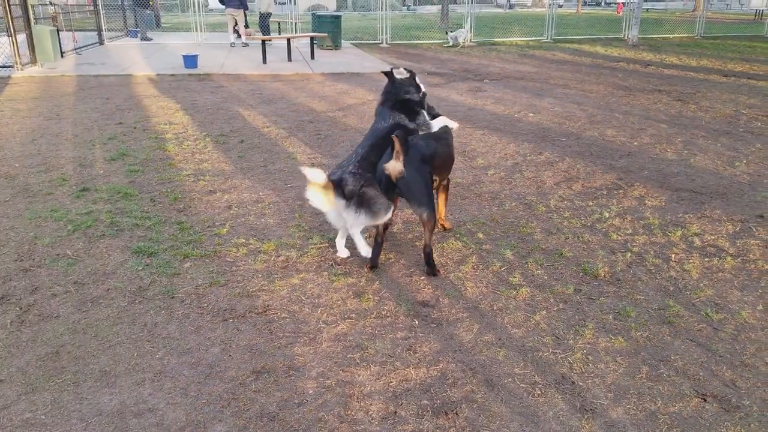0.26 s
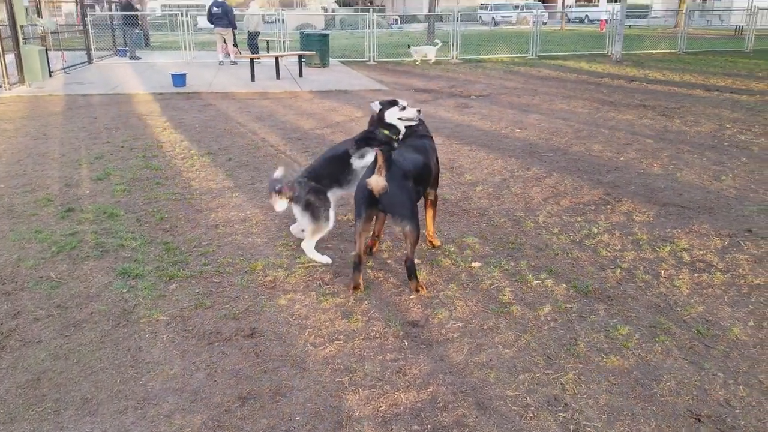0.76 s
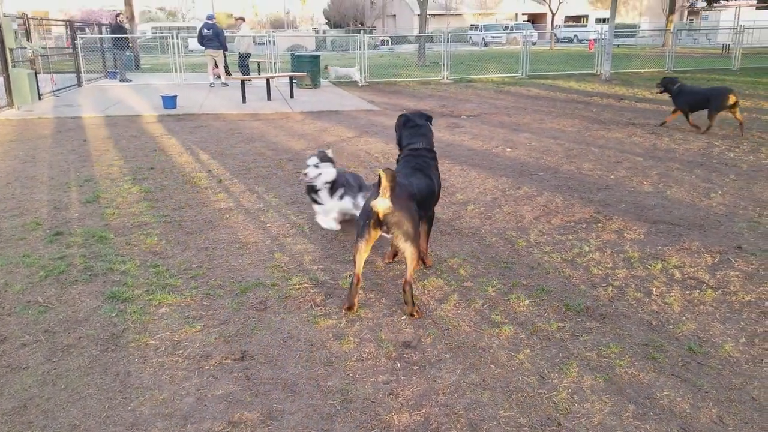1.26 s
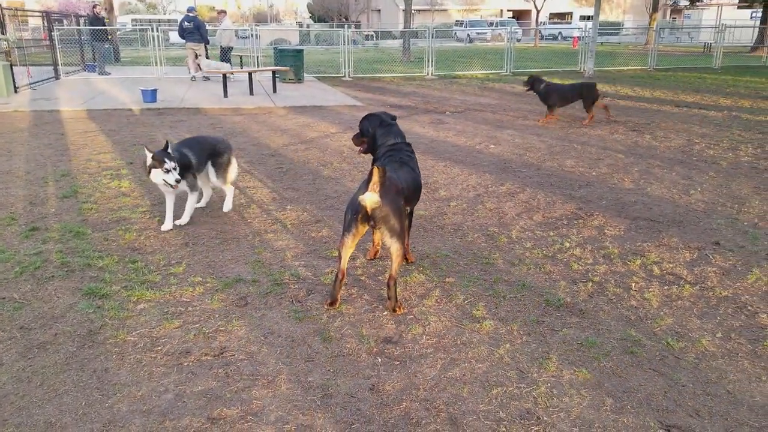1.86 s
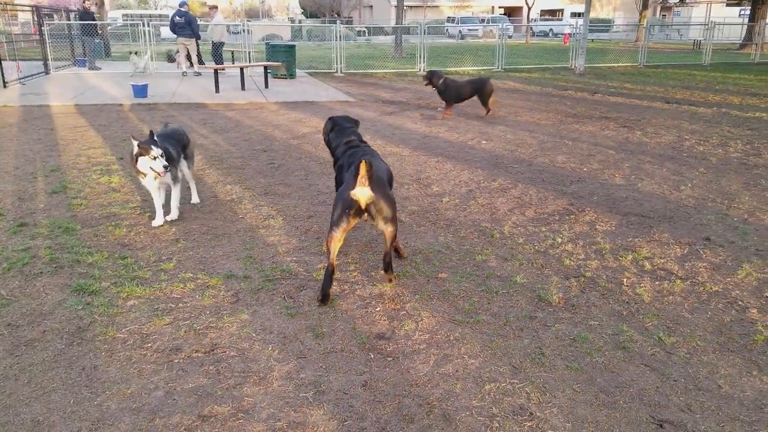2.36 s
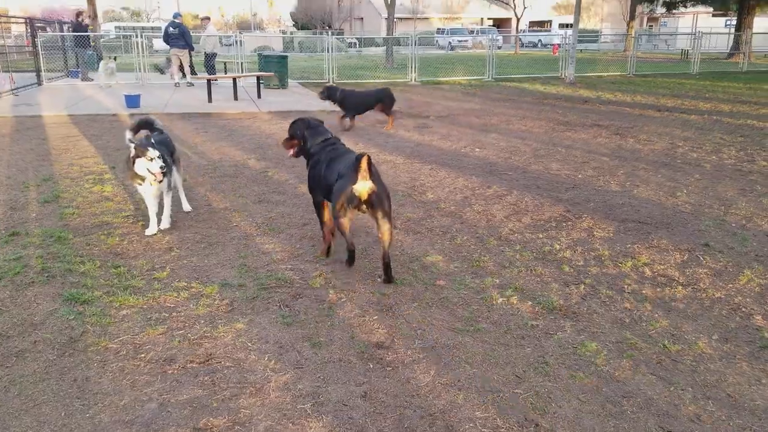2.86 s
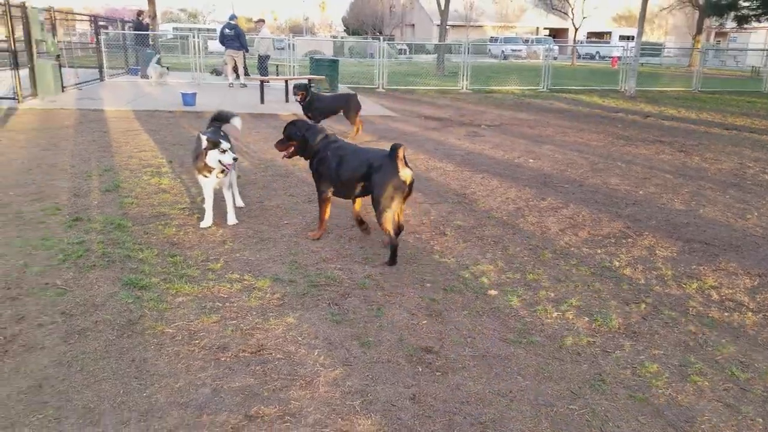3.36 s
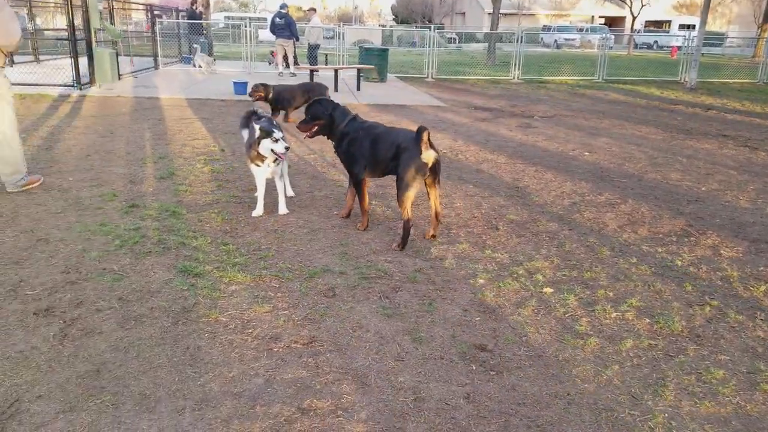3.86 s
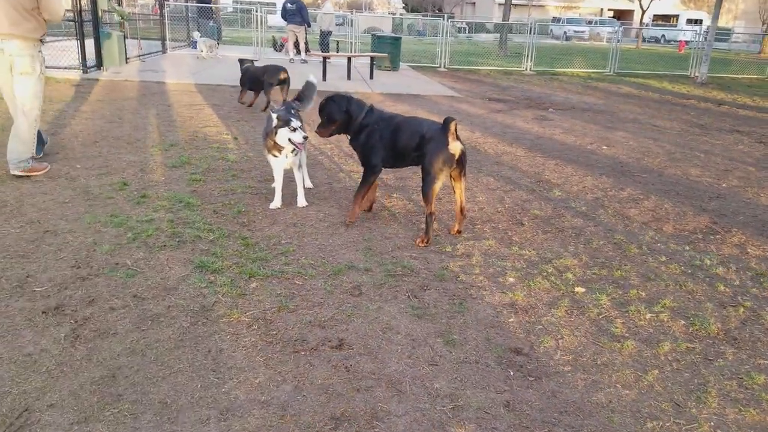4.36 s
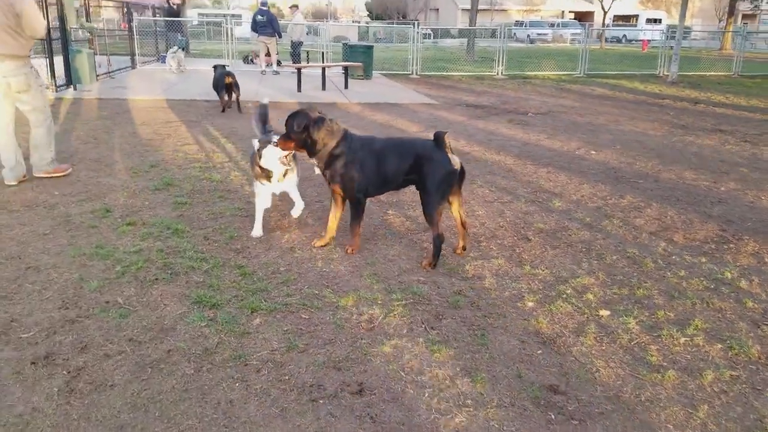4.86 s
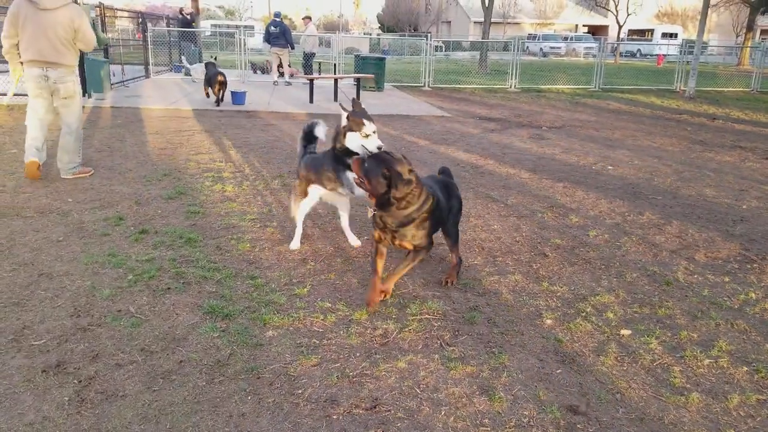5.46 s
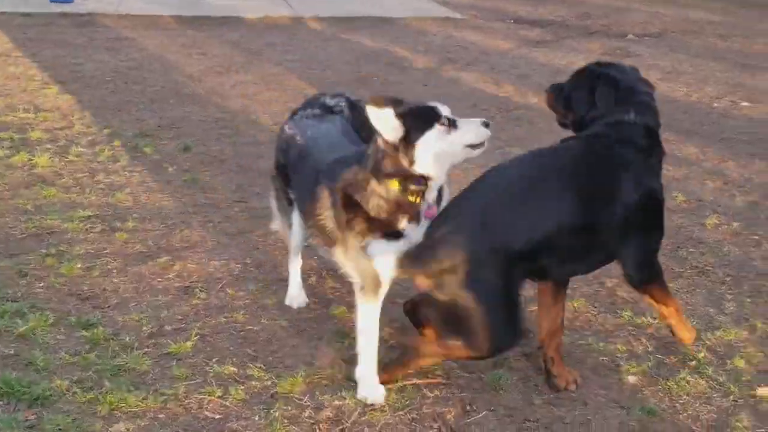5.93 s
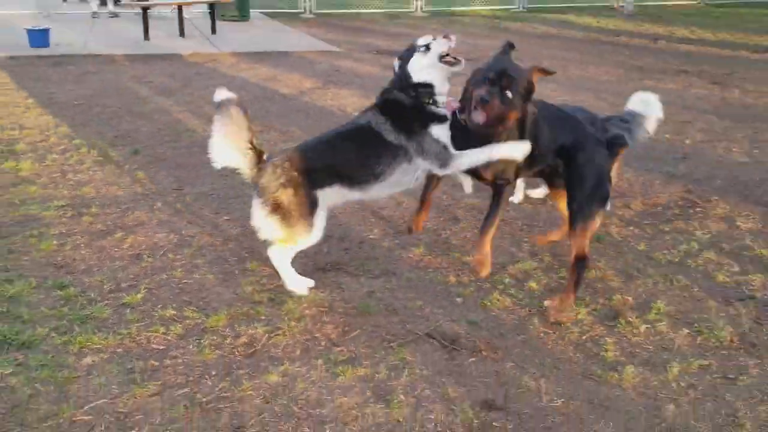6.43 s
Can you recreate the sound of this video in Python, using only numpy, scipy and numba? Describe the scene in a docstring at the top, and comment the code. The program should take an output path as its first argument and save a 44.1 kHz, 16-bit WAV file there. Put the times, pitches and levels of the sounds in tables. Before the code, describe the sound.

Handheld phone sound of two big dogs playing roughly in an open park. A tight burst of strong mid-pitched barks comes first, then a quieter spell of panting huffs, tiny metallic tag jingles and short squeaky whines. Barks resume about every half second, with faint echo off distant houses. Finally snorts, snarls, bright tag rattles and gritty paw thuds come closer over steady low traffic.

```python
"""The tail of a bark opens the scene over a rumble of traffic, and more rough barks follow: two dogs
wrestle on the dirt of an open park. Each voice is a source and a filter: tones or rasping fold pulses
drive the resonances of a throat. A growl, snarls, huffs, thin whines, a moan and a hoarse cry join in.
Collar tags ring as sums of decaying modes; paws scrape and thud as shaped noise.
Distant houses and trees return a faint echo, made by convolution with decaying noise."""
import sys
import numpy as np
from scipy import signal
from scipy.fft import rfft, irfft
from scipy.io import wavfile
from scipy.ndimage import uniform_filter1d, minimum_filter1d
from numba import njit

SR = 44100
rng = np.random.default_rng(int(sys.argv[2]) if len(sys.argv) > 2 else 0)


def wav_record(signal):
    """Record a signal, one row per channel, as 16-bit PCM in the file named by sys.argv[1]."""
    frames = np.transpose(np.atleast_2d(signal))
    bounded = np.clip(frames, -1, 1)
    # unit amplitude maps onto the largest positive 16-bit level
    quanta = np.round(bounded * 32767).astype(np.int16)
    wavfile.write(sys.argv[1], SR, quanta)


N = 295236


def undb(db):
    """Level: decibels to amplitude gain."""
    return 10 ** (np.asarray(db) / 20)


def unit(x):
    """Normalization: scale to rms 1."""
    return x / np.sqrt(np.mean(x ** 2) + 1e-18)


def add(out, start_s, x):
    """Superposition: mix a sound into both channels from a start time on."""
    i = max(int(start_s * SR), 0)
    out[:, i:i + x.shape[-1]] += x[..., :N - i]


def clock(length_s):
    """Time base: seconds since the start of a sound, and a 3 ms fade at both edges."""
    t = np.arange(int(length_s * SR)) / SR
    return t, np.clip(np.minimum(t, length_s - t) / .003, 0, 1)


def play(rows):
    """Interpolation: start time, a 3 ms edge fade and every column of a curve, sample by sample."""
    s, *columns = np.transpose(rows)
    t = np.arange(int(s[0] * SR), int(s.max() * SR)) / SR
    fade = np.clip(np.minimum(t - t[0], t[-1] - t) / .003, 0, 1)
    return (s[0], fade, *(np.interp(t, s, c) for c in columns))


def swell(t, attack_s, release_s, edge_db=24):
    """Envelope: attack, hold and release, in dB below the held level; each edge lies edge_db down."""
    rise = np.clip(1 - t / attack_s, 0, 1) ** 2
    fall = np.clip(1 - (t[-1] - t) / release_s, 0, 1) ** 2
    return -edge_db * (rise + fall)


def arch(t, share, first, crest, last):
    """Control contour: a value moves to its crest at a share of the length, and on to its last value."""
    return np.interp(t / t[-1], [0, np.clip(share, .02, .98), 1], [first, crest, last])


def walk(n, rate_hz):
    """Random modulation: a smooth wander with a spread near 1."""
    k = max(int(SR / rate_hz), 1)
    steps = np.repeat(rng.standard_normal(n // k + 2), k)
    return 1.2 * uniform_filter1d(steps, k)[k // 2:k // 2 + n]


@njit
def svf(x, hz, width):
    """Resonance: a state-variable band-pass whose centre may move."""
    y, b, l = np.empty(len(x)), 0., 0.
    for i in range(len(x)):
        g, k = np.tan(np.pi * hz[i] / SR), width / hz[i]
        v = (b + g * (x[i] - l)) / (1 + g * (g + k))
        b, l, y[i] = 2 * v - b, l + 2 * g * v, k * v
    return y


def resonate(x, hz, width_hz):
    """Cascaded resonance: the band-pass applied twice for steep skirts, then scaled to rms 1."""
    hz = hz * np.ones(len(x))
    return unit(svf(svf(x, hz, float(width_hz)), hz, float(width_hz)))


def band(x, lo_hz, hi_hz, order=2):
    """Band limiting: a Butterworth band-pass."""
    sos = signal.butter(order, [lo_hz, min(hi_hz, .47 * SR)], "band", fs=SR, output="sos")
    return signal.sosfilt(sos, x)


def steady(x, seconds=0.029):
    """Level equalization: even out slow swings of power and keep the fast rasp."""
    power = np.abs(uniform_filter1d(x ** 2, max(int(seconds * SR), 8)))
    return x / np.sqrt(power + 1e-9)


def pan(db):
    """Interchannel level difference: left and right gains, with db as left minus right."""
    return undb(np.array([[db], [-db]]) / 2)


def spread(draw, alike):
    """Interchannel correlation: two channels from a shared and an opposed sound."""
    alike = np.clip(alike, 0, 1)
    return np.sqrt((1 + alike) / 2) * draw[0] + np.sqrt((1 - alike) / 2) * draw[1] * np.array([[1], [-1]])


def park():
    """Shaped noise and a wavering tone: traffic rumble, an engine drone and a distant wash of the town."""
    # spectral shape of the noise, before its low and high parts are levelled: hz, level_db
    colour_curve = [(15, -42), (25, -16), (82, -1), (140, -1), (193, -4), (368, -15), (614, -20.5),
                    (919, -19), (2560, -25), (3340, -37), (5280, -44), (6380, -44.5), (9550, -54),
                    (12500, -47), (15500, -46.5)]
    # background rumble as heard at the phone, with its dips, before a 2 dB lift: time_s, level_db
    rumble_curve = [(0.0, -47.5), (0.69, -54.5), (1.49, -52), (1.75, -47), (4.49, -48.5), (5.09, -54.5),
                    (6.69, -48.5)]
    # wash as heard at the phone, with its dips and rises, before a 3 dB cut: time_s, level_db
    wash_curve = [(0, -52), (.6, -49), (1.3, -56), (2, -46.5), (2.5, -50.5), (3.1, -46), (4.9, -49),
                  (5.2, -53.5), (5.5, -49), (6.69, -43)]
    drone_hz, drone_db = 145, -54.5  # mean pitch; mean level where the rumble curve is highest
    time = np.arange(N) / SR
    rumble_db, wash_db = (np.interp(time, *np.transpose(curve)) for curve in (rumble_curve, wash_curve))
    f = np.arange(N // 2 + 1) * SR / N + 1
    hz, db = np.transpose(colour_curve)
    colour = undb(np.interp(np.log(f), np.log(hz), db))
    # the channels agree most in the low frequencies
    alike = 0.92 / (1 + (f / 1500) ** 2) / (1 + (20 / f) ** 2)
    noise = colour * spread(rfft(rng.standard_normal((2, N))), alike)
    low_share = 1 / (1 + (f / 400) ** 4)
    rumble = unit(irfft(noise * low_share, N)) * undb(rumble_db + 2.0 + walk(N, 19))
    wash_flutter_db = 2.8 * walk(N, 2.49) + 0.59 * walk(N, 16)
    wash = unit(irfft(noise * (1 - low_share), N)) * undb(wash_db - 3.0 + wash_flutter_db)
    drone = unit(np.sin(2 * np.pi * np.cumsum(drone_hz * (1 + 0.026 * walk(N, 8.4))) / SR))
    return rumble + wash + drone * undb(drone_db + rumble_db - rumble_db.max() + 4 * walk(N, 5.0))


def folds(hz, rough, jitter=.14, shimmer_db=4, puff=0.93):
    """Glottal excitation: uneven pulses, each followed by a puff of turbulent air."""
    n = len(hz)
    phase = np.cumsum(hz * np.exp(jitter * rough * walk(n, 220))) / SR % 1
    pulses = (np.diff(phase, prepend=0) < 0) * undb(shimmer_db * rough * walk(n, 162.69))
    air = np.exp(-phase / puff) * rng.standard_normal(n)
    return unit(pulses) + rough * unit(air)


def bark(row, throat):
    """Source-filter voice: a wavering tone and rasp drive a throat; the jaw opens and shuts the mouth sound."""
    # widths of the four throat resonances a to d, in Hz
    mouth_widths_hz = [242, 234, 248, 382]
    rasp_share, rough = .25, .65  # the folds rasp at this share of the pitch; roughness 0-1
    tone_db, half_tone_db, hiss_db = 0.5, -37, -36  # relative levels inside the bark
    mouth_rise, brighten_db = 0.066, 4  # over a bark: lift of the resonances (share), gain of resonance d
    _, length, attack, release, level_db, first_hz, crest_hz, last_hz, *rest = row
    crest, widest, shut_db, a_db, upper_db, side, _ = rest
    *mouth_hz, top_hz, b_db, d_db, follow = throat
    t, fade = clock(length)
    n = len(t)
    hz = arch(t, crest, first_hz, crest_hz, last_hz)
    effort_db = swell(t, attack, release)
    # the jaw is still 0.12 open as the bark ends
    jaw_db = -shut_db * (1 - np.sin(np.pi / 2 * arch(t, widest, 0, 0.97, 0.12)))
    relative_pitch = hz / np.average(hz, weights=undb(effort_db))

    # soft parts of a bark stay cleaner; pushed hard, the folds break into rasp
    push = undb(0.15 * effort_db)
    phase = 2 * np.pi * np.cumsum(hz * (1 + 0.052 * rough * push * walk(n, 259.63))) / SR
    flutter = undb(5 * rough * push * walk(n, 220))
    tone = unit(flutter * np.sin(phase))
    overtones = unit(flutter * sum(np.sin(k * phase) for k in range(2, 5)))
    rasp = folds(rasp_share * hz, rough)
    source = push * unit(band(rasp, 550, 3600)) + undb(tone_db - 8.5) * overtones
    low = steady(push * resonate(rasp, hz * 0.97, 250) + undb(tone_db) * tone, seconds=0.017)

    # the lips draw back; the resonances bend with or against the pitch, as the exponent sets
    lips = t / length - .5
    glide = relative_pitch ** follow * (1 + mouth_rise * lips)
    mouth_a, mouth_b, mouth_c, mouth_d = (resonate(source, f * glide, w)
                                          for f, w in zip(mouth_hz, mouth_widths_hz))
    mouth_d = mouth_d + undb(-13) * unit(band(source, 2200, 2980))
    upper = undb(b_db) * mouth_b + mouth_c + undb(d_db + brighten_db * lips) * mouth_d
    # the sound fades above the top edge
    upper = steady(band(upper, 1200.0, top_hz, order=8), seconds=0.013)

    # air hisses past the teeth; each microphone port favours its own part of the treble
    air = flutter * rng.standard_normal((2, n))
    ports = np.array([resonate(air[0], 5700, 3900), 0.86 * resonate(air[1], 7600, 3800)])
    broad_air = undb(-3) * unit(band(air, 3000, 20000))
    # the -0.3 makes the hiss follow the jaw less than the resonances do
    hiss = undb(hiss_db - 0.3 * jaw_db) * (ports + broad_air)
    treble = undb(upper_db) * pan(2 + 2.8 * side) * (upper + hiss)

    half_tone = unit(flutter * np.sin(phase / 2))
    chest = undb(-39.5) * unit(band(rasp, 150, 290)) + undb(half_tone_db) * half_tone
    body = undb(effort_db) * (band(low, 446.0, 1500, order=5) + chest)
    # the mouth opens after the voice starts, then flares and fades unevenly
    flare_db = swell(t, 0.11 * length, 0.0069) + 1.5 * push * walk(n, 80.4)
    mouth = undb(jaw_db + flare_db) * (undb(a_db) * steady(mouth_a, seconds=0.0061) + treble)
    left, right = fade * undb(level_db) * (body + mouth)
    # for a dog on the left, sound reaches the right microphone port 0.1 ms later
    return np.array([left, np.interp(t - side * .0001, t, right)])


def barks():
    """Articulation: each bark has its own pitch arch and throat; yields start, sound and echo level."""
    # start_s, length_s, attack_s, release_s, level_db, first_pitch_hz, crest_pitch_hz, last_pitch_hz,
    # crest_share and widest_jaw_share (of the length), shut_jaw_damping_db, resonance_a_db,
    # other_resonances_db, side (-1 right to 1 left), echo_db
    bark_rows = [ (0, 0.044, 0.0033, 0.053, -9.5, 694, 634, 545, 0.16, 0.04, 27, -1, -12.5, -0.55, 1.5),
                 (0.037, 0.13, 0.025, 0.046, -17.5, 659, 714.6, 580, 0.56, 0.67, 11.5, -3.5, -12, -1.05, 4),
                 (0.165, 0.15, 0.08, .08, -9.5, 665, 698.7, 548, 0.28, 0.51, 26, -7, -16, -0.97, 0),
                 (.47, 0.12, 0.016, 0.034, -20.5, 681, 790.2, 524, 0.28, 0.45, 21.5, -4, -3.5, -.8, 4),
                 (2.022, .11, 0.024, 0.1, -24, 527.6, 558.4, 457, 0.34, 0.46, 18, -15.5, -21, 1, 3),
                 (3.117, 0.15, 0.037, 0.016, -14.5, 598.7, 785, 493, 0.54, 0.66, 25, 1.5, -5.5, 1, 4),
                 (3.668, 0.15, 0.017, 0.081, -14.5, 628, 775, 572, 0.34, 0.47, 28, -4, -8.5, 0.79, 4),
                 (4.209, .123, 0.032, 0.036, -13.5, 620, 741, 557.5, .4, 0.8, 22.5, -7.5, -11, .7, 4.5),
                 (4.791, .146, 0.038, 0.024, -12.5, 934.5, 971, 761, 0.19, .33, 16.5, -5, 0, .75, -8),
                 (5.585, 0.23, 0.22, 0.068, -13, 420, 771, 521.5, 0.67, 0.7, 38, -5, -7, 0.54, -.5),
                 (5.89, .15, 0.083, 0.024, -19.5, 400, 732, 760, .88, 0.58, 34, -3.5, 0.5, -0.45, -2)]
    # four throat resonances in each bark, not in order of pitch: a_hz, b_hz, c_hz, d_hz, top_edge_hz,
    # b_db, d_db, pitch_exponent (resonances move with the pitch if positive, against it if negative)
    throat_rows = [ (1156, 2600, 2026, 2350, 2370, -3, -7, 0.49),
                   (1090, 980, 1600, 2500, 2300, 5.5, -20.5, 0.085),
                   (1205, 3300, 2100, 2340, 2590, -4, -2.5, 0.54),
                   (1173, 1436, 1640, 2120, 2500, -1.5, -9.5, -0.064),
                   (1140, 850, 1720, 2800, 1900, -19, -3, .1),
                   (1047, 1410, 1630, 2210, 2640, -7, -13, -0.099),
                   (1090, 1593, 1680, 2028, 2300, -5, -4.5, -0.45),
                   (1117, 1360, 1566, 2100, 2600, -5.5, -10, -0.16),
                   (1158, 1870, 2117, 2670, 3020, 4, -11.5, 0.82),
                   (1064, 1630, 1874, 1400, 2634, 1, -34, 0.28),
                   (1423, 1820, 2030, 2208, 2860, -2, -17, -0.07)]
    for row, throat in zip(bark_rows, throat_rows):
        yield row[0], bark(row, throat), row[-1]


def echoes(x, near_db=-19, near_t60=0.23, far_db=-29, far_t60=0.85):
    """Reverberation: fences and benches scatter early; houses and trees keep a faint, coloured tail."""
    # bands that linger in the echo: centre_hz, width_hz, level_db
    echo_bands = [(646, 94, -11.5), (1070, 100, -0.5), (1684, 260, 10.5)]
    t = np.arange(int(1.5 * SR)) / SR
    response = 0
    for db, t60, onset_s in ((near_db, near_t60, .012), (far_db, far_t60, .06)):
        scatter = spread(rng.standard_normal((2, len(t))), 0.11)
        rings = np.array([sum(undb(d) * resonate(side, hz, width) for hz, width, d in echo_bands)
                          for side in scatter])
        # the rings lie 20 dB below the diffuse part
        tail = unit(band(scatter, 340, 8200, order=1)) + undb(-20) * unit(rings)
        tail = tail * np.exp(-np.log(1000) * t / t60) * (1 - np.exp(-(t / onset_s) ** 2))
        response = response + undb(db) * unit(tail) / np.sqrt(len(t))
    return signal.fftconvolve(x.mean(axis=0)[None], response, axes=1)[:, :N]


def clink(low_db, mid_db):
    """Modal synthesis: one tag hits another, a tick and then decaying modes of randomly varied strength."""
    # hz, level_db (before group trims and scatter), t60_s
    modes = [(5030, -13, 0.038), (5610, -15, .1), (6437, 2.5, 0.071), (6830, -6, 0.025), (8510, -7, 0.22),
             (10080, 7.5, 0.087), (10610, 3.5, 0.13), (12800, -19, .08), (13050, -5, 0.1), (13400, -7, .07),
             (14200, -6.5, 0.084), (14600, -4.5, 0.077), (15400, -20, .06)]
    # left minus right, in dB, for the low, middle and high modes
    mode_pan_db = (8.5, -7.5, 0)
    t = np.arange(SR // 4) / SR
    hz, db, t60 = np.transpose(modes)[:, :, None]
    group = np.digitize(hz, [8000, 12000])
    db = db + np.array([low_db, mid_db, -3])[group]
    db = db + np.array(mode_pan_db)[group] * np.array([[[.5]], [[-.5]]])
    strength, phase, detune = rng.standard_normal((3, 2, len(hz), 1))
    wobble = 1 + 0.0019 * detune[0]
    ring = undb(db + 7 * strength - 60 * t / t60) * np.sin(2 * np.pi * hz * wobble * t + np.pi * phase)
    # the edges scrape for a moment as they meet
    scrape = band(rng.standard_normal((2, len(t))), 9000, 21000, order=1) * np.exp(-t / 0.017)
    return (0.34 * unit(ring.sum(axis=1)) + undb(0.5) * scrape) * (1 - np.exp(-t / 0.00031))


def tags():
    """Repeated impact: collar tags meet once a swing, and faint grazes cluster around each strike."""
    # clearest strikes: start_s, level_db (before a 12 dB cut), low_modes_db, middle_modes_db (mode trims)
    clear_strikes = [(1.0755, -40, -18, -46), (1.1543, -43.5, -19, -6), (1.2239, -44, -14, -13),
                     (1.4268, -39, -4, -7), (1.5341, -44.5, 3, -19), (1.7674, -44.5, -8, -36),
                     (2.203, -45, 6, -31.5), (4.3731, -48, -15, -27), (4.9367, -47.5, -4, -17),
                     (5.233, -38.5, -10.5, -9.5), (5.2928, -36, -20, -10), (5.5378, -32, -18, -25),
                     (5.6017, -32.5, -17.5, -27), (5.7617, -33, -3, -16), (6.0425, -35.5, 2, -16),
                     (6.3447, -27, -11, -4), (6.4258, -24, -9, -15), (6.4424, -23.5, 2, -7),
                     (6.4943, -25.5, -9.5, -29), (6.6086, -16.5, -0.5, -15), (6.6162, -29, -26, -21.5)]
    # spells of lighter jingling: start_s, length_s, then level and mode trims as above
    jingle_spells = [(0.062, .3, -59, -5.5, -8), (1.614, .55, -49, -4.5, -25), (2.314, .2, -50.5, 7, -23),
                     (5.499, .05, -39, -3, -14), (5.976, .14, -34, -17, -18), (6.32, .3, -32.5, -9, -20)]
    swing_s, scatter_s, scatter_db = 0.12, 0.0048, 5.5
    out, strikes = np.zeros((2, N)), list(clear_strikes)
    for start, length, db, low_db, mid_db in jingle_spells:
        for swing, (late, louder) in zip(np.arange(0, length, swing_s), rng.standard_normal((20, 2))):
            strikes.append((start + swing + scatter_s * late, db + scatter_db * louder, low_db, mid_db))
    for start, db, low_db, mid_db in strikes:
        add(out, start, undb(db - 12) * clink(low_db, mid_db))
        for delay, softer_db in zip(rng.uniform(-0.017, 0.058, size=3), rng.uniform(15.9, 30.7, size=3)):
            add(out, start + delay, undb(db - softer_db) * clink(low_db, mid_db))
    return out


def harmonics(hz, harmonics_db, jitter):
    """Harmonic series: regular vibration with a few harmonics on one gliding, jittered pitch."""
    phase = 2 * np.pi * np.cumsum(hz * (1 + jitter * walk(len(hz), 180))) / SR
    return unit(sum(undb(h) * np.cos((k + 1) * phase) for k, h in enumerate(harmonics_db)))


def clean_call(rows, harmonics_db, jitter):
    """Periodic phonation: a voiced call that follows its pitch and level curve."""
    start, fade, hz, db = play(rows)
    return start, fade * undb(db) * harmonics(hz, harmonics_db, jitter)


def growl():
    """Low phonation: many harmonics of a low pitch."""
    # time_s, pitch_hz, level_db
    growl_curve = [(.3, 157.7, -38), (.325, 149, -35.5), (.36, 144.7, -38), (.395, 166.3, -33),
                   (.42, 164.1, -37), (.45, 141, -58)]
    harmonics_db = [-18.5, -23.5, -6.5, -3.5, -7.5, -25.0, -12.5, -21, -36.0, -16, -17.5, -27, -37.5, -15.0,
                    -26.0]
    return clean_call(growl_curve, harmonics_db, jitter=0.012)


def snarl(length, chest_db, mouth_db, lips_db):
    """Turbulent source and filter: slow, breathy fold pulses sound through chest and bared teeth."""
    # mouth resonances: centre_hz, width_hz, relative_db
    mouth_resonances = [(1310, 240, 3.5), (1928, 200, 1), (2510, 290, -0.5)]
    t, fade = clock(length)
    n = len(t)
    source = folds(np.full(n, 110.), rough=0.817) + 0.54 * rng.standard_normal(n)
    drift = 1 + .025 * walk(n, 19.3)
    release_s = .45 * length
    # in all but the shortest snarls, air rushes first and the chest joins in
    chest = steady(resonate(source, 660 * drift, 260)) * undb(swell(t, 0.42 * length, release_s))
    second, *upper = (undb(db) * resonate(source, hz * drift, width) for hz, width, db in mouth_resonances)
    mouth = steady(band(second + undb(lips_db) * sum(upper), 800, 2600, order=6))
    mouth = mouth * undb(swell(t, 0.021, release_s))
    return fade * (undb(chest_db - 9.5) * chest + undb(mouth_db - 6.0) * mouth)


def snarls():
    """Superposition: breathy snarls and snorts, each with its own balance of chest and mouth."""
    # start_s, length_s, chest_db (before a 9.5 dB cut), mouth_db (before a 6 dB cut),
    # lips_db (change of the upper resonances by the lips)
    snarl_rows = [(1.065, .1, -32, -33, -2), (1.383, 0.05, -37.5, -49, -2), (4.765, 0.038, -30, -31.5, -6),
                  (5.261, 0.18, -32, -34, -7), (5.452, 0.043, -35, -39, -1.5), (5.536, 0.065, -35, -44, -4),
                  (6.036, 0.062, -33, -39.5, 4), (6.226, 0.039, -33, -34.5, 2),
                  (6.332, 0.11, -66, -38, 2.5), (6.483, 0.023, -27, -27.5, 14),
                  (6.553, 0.08, -42, -29.5, 6), (6.626, 0.09, -28.5, -41, -13)]
    out = np.zeros((2, N))
    for start, *row in snarl_rows:
        add(out, start, snarl(*row))
    return out


def huffs():
    """Filtered turbulence: short puffs of air through a dog's muzzle."""
    # start_s, length_s, level_db, nasal_hiss_db
    huff_rows = [(1.072, 0.1, -47, -54.5), (1.49, 0.11, -56, -68), (1.797, 0.13, -51.5, -80),
                 (2.188, 0.08, -51.5, -75.5), (2.288, 0.1, -55, -83), (5.064, 0.076, -52, -67)]
    out = np.zeros((2, N))
    for start, length, db, nose_db in huff_rows:
        air = rng.standard_normal(SR)[:int(length * SR)]
        muzzle = .5 * resonate(air, 1350, 500) + resonate(air, 2200, 460)
        nose = unit(band(air, 2700, 3970, order=2))
        add(out, start, np.hanning(len(air)) ** .5 * (undb(db) * muzzle + undb(nose_db) * nose))
    return out


def whine(length, first_hz, last_hz, db, octave_db, loudest):
    """Frequency glide: a thin nasal whine, sometimes with a strong octave, swells, fades and slides."""
    t, fade = clock(length)
    hz = first_hz + (last_hz - first_hz) * (t / length) ** 2
    level = undb(db + arch(t, loudest, -19, 0, -18))
    return fade * level * pan(7) * harmonics(hz, [0, octave_db], jitter=0.0028)


def whines():
    """Superposition: thin whines, louder on the left."""
    # start_s, length_s, first_pitch_hz, last_pitch_hz, level_db, octave_db (relative),
    # loudest_share (of the length)
    whine_rows = [(2.082, .058, 2630, 2600, -33.5, -21, 0.87), (2.133, 0.037, 2395, 2635, -24.5, -32, 0.48),
                  (3.957, 0.094, 2690, 2670, -54, 1, 0.79), (4.064, 0.065, 2800, 2730, -67, -27, 0.55),
                  (4.259, 0.078, 2800, 2500, -47.5, 0, 0.85)]
    out = np.zeros((2, N))
    for start, *row in whine_rows:
        add(out, start, whine(*row))
    return out


def grit(n, spread_db=3):
    """Random impacts: a dense crackle of dirt grains with a few large ones."""
    sizes = undb(spread_db * np.minimum(rng.exponential(size=n), 4))
    grains = (rng.random((2, n)) < 7000 / SR) * sizes  # 7000 grains a second in each draw
    grains = spread(grains * rng.standard_normal((2, n)), 0.15)
    return unit(band(grains, 2100, 5900, order=1))


def paws():
    """Friction and impact: paws scrape the dirt and land with a thud and a spray of grit."""
    # hard falls and kicks: start_s, grit_db, thud_db, decay_s (time constant)
    paw_falls = [(2.169, -45, -21, 0.0022), (2.859, -50, -62, 0.0034), (5.296, -56.5, -39.5, 0.017),
                 (6.025, -72, -42, 0.017), (6.426, -42, -55, 0.0095), (6.493, -30, -51, 0.0042),
                 (6.584, -41, -35, 0.011)]
    # scrapes on loose dirt: start_s, length_s, level_db
    scrapes = [(5.658, 0.074, -48), (6.017, 0.19, -60), (6.294, 0.33, -47), (6.418, 0.052, -50)]
    out = np.zeros((2, N))
    for start, length, db in scrapes:
        n = int(length * SR)
        add(out, start, undb(db) * np.hanning(n) * grit(SR // 2)[:, :n])
    t = np.arange(SR // 5) / SR
    for start, grit_db, thud_db, decay in paw_falls:
        thud = unit(band(rng.standard_normal(len(t)), 98, 320))
        add(out, start, np.exp(-t / decay) * (undb(grit_db) * grit(len(t)) + undb(thud_db) * thud))
    return out


def moan():
    """Mid-pitched phonation: four harmonics with a strong fundamental."""
    # time_s, pitch_hz, level_db
    moan_curve = [(6.385, 469, -54), (6.41, 504, -31), (6.435, 533, -37.5), (6.47, 503, -38.5),
                  (6.495, 507, -41.5)]
    return clean_call(moan_curve, harmonics_db=[2.0, -11.5, -4.5, -28.5], jitter=0.044)


def cry():
    """Jittered phonation: strong pitch jitter makes the closing cry hoarse."""
    # time_s, pitch_hz, level_db
    cry_curve = [(6.54, 710, -74), (6.55, 753, -28.5), (6.568, 781.5, -45), (6.635, 835, -42),
                 (6.665, 711, -35), (6.69, 589.7, -38)]
    return clean_call(cry_curve, harmonics_db=[0, -12, -16], jitter=0.0527)


def scene():
    """Superposition: the dogs, their tags and paws, the echo and the park."""
    dogs = tags() + snarls() + huffs() + whines() + paws()
    for call in (growl(), moan(), cry()):
        add(dogs, *call)
    outward = dogs.copy()
    for start, sound, echo_db in barks():
        add(dogs, start, sound)
        # a bark aimed at the houses echoes more than one aimed at the phone
        add(outward, start, undb(echo_db) * sound)
    return dogs + echoes(outward) + park()


def record(dry):
    """Peak limiting and band limiting: a phone turns its gain down around the loudest peaks, cuts the top."""
    room = np.minimum(1, .98 / (np.abs(dry).max(axis=0) + 1e-9))
    gain = uniform_filter1d(minimum_filter1d(room, size=301), size=301)
    low_pass = signal.ellip(8, .2, 70, 15850, fs=SR, output="sos")
    return signal.sosfilt(low_pass, dry * gain)


dry = scene()
out = record(dry)
wav_record(out)
```